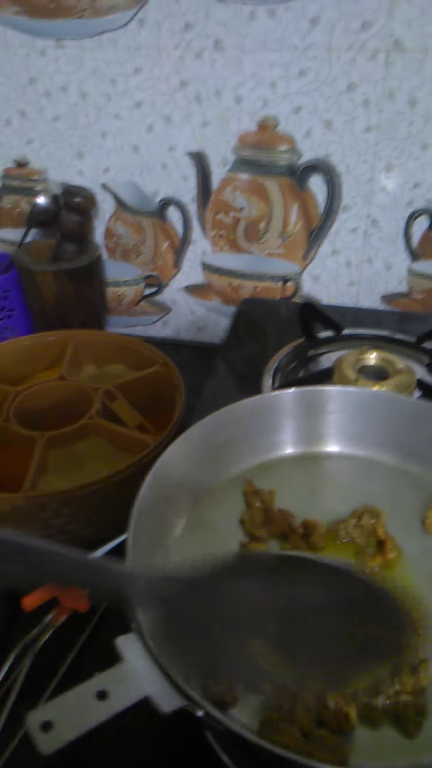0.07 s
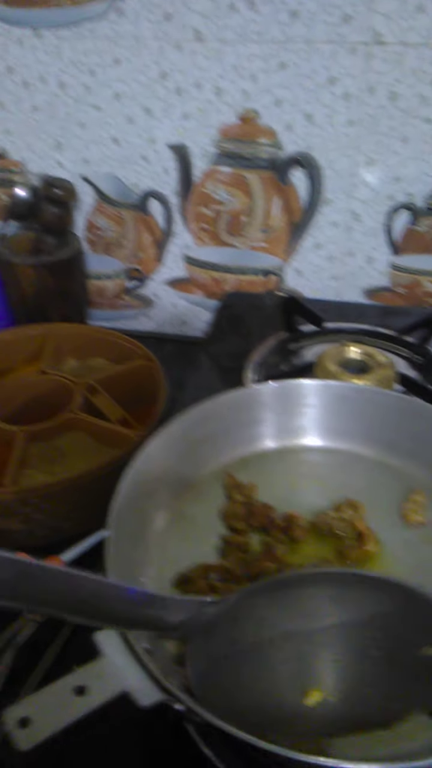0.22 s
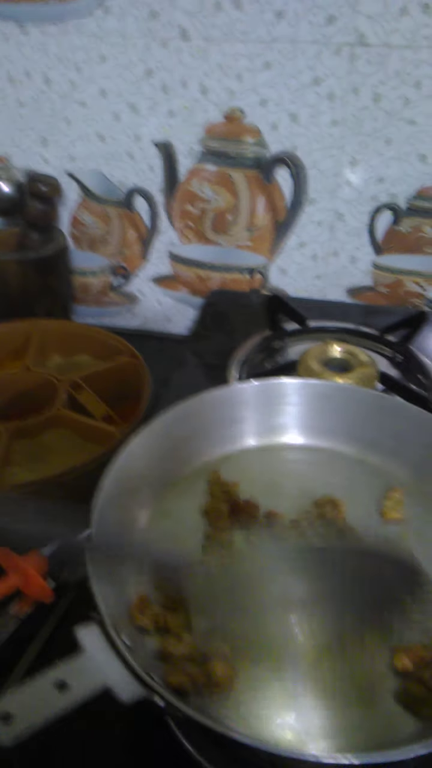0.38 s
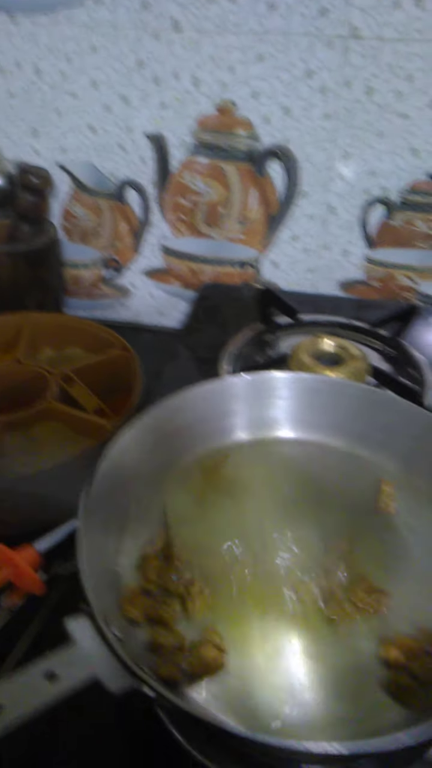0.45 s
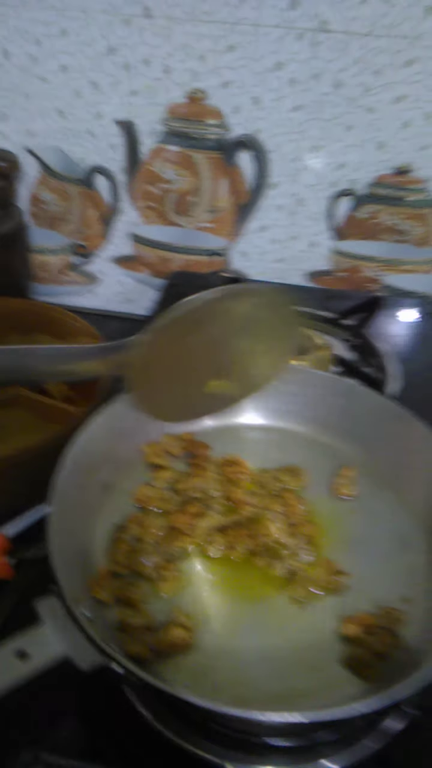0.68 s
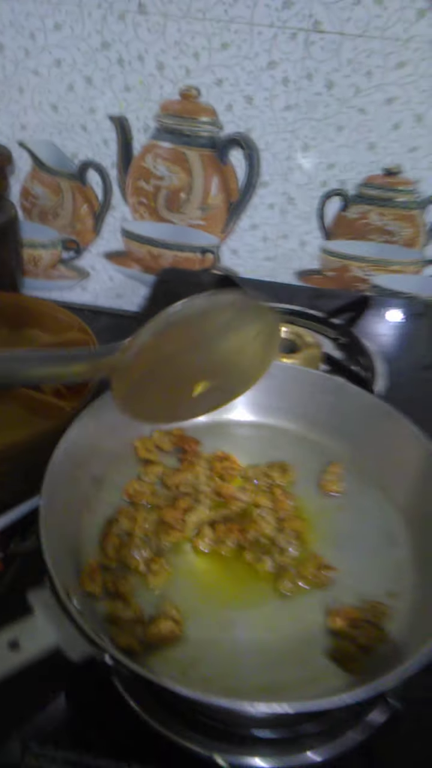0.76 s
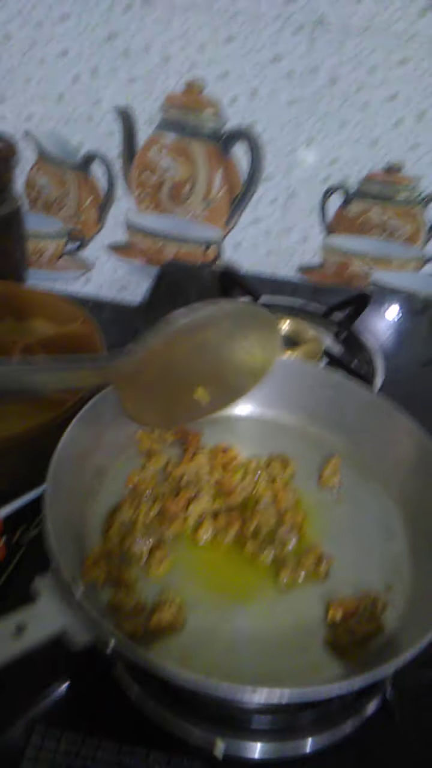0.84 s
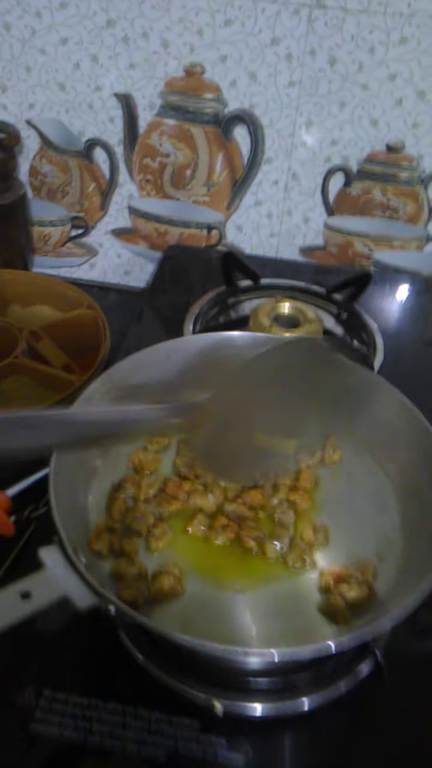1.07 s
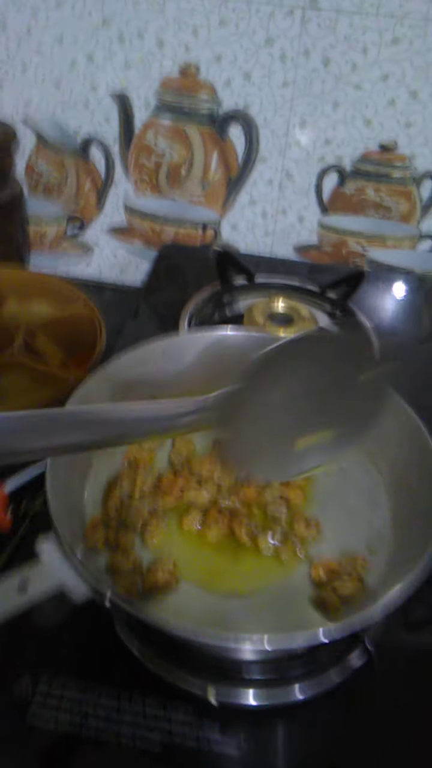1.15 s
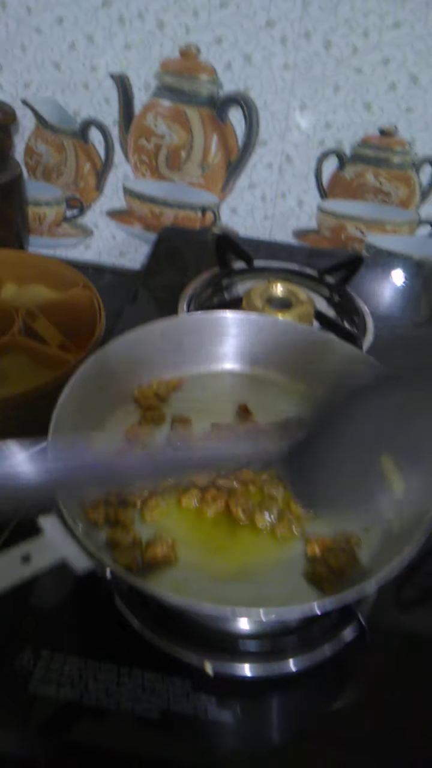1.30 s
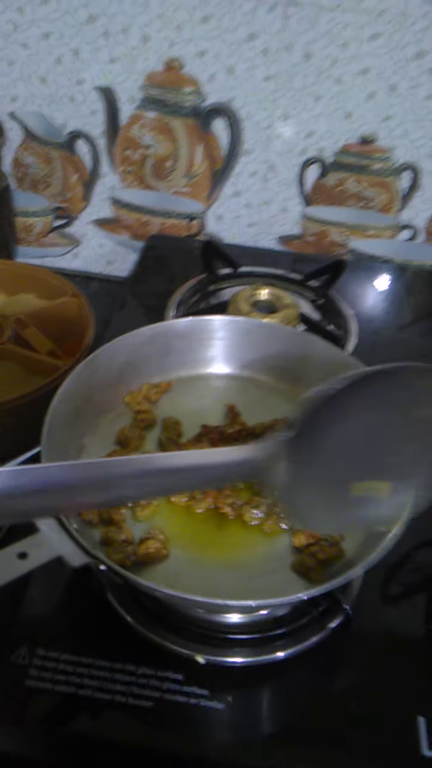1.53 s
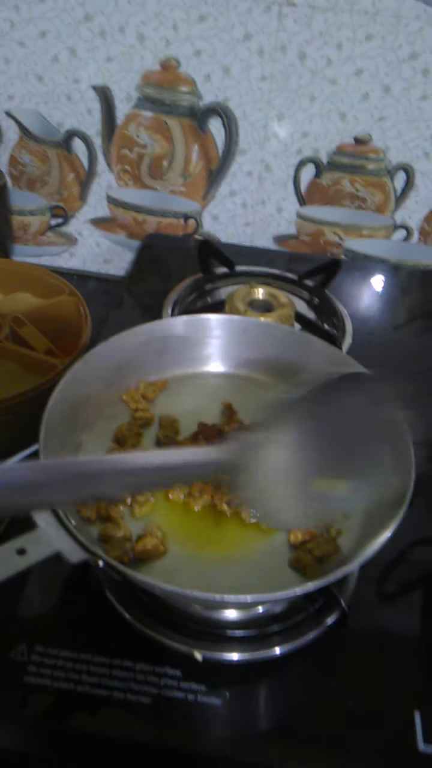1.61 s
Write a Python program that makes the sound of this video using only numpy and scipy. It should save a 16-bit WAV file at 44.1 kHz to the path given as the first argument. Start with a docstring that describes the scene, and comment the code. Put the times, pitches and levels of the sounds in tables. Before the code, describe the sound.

A steel ladle scrapes, knocks and grinds in a steel pan, then strikes its rim

```python
"""Ladle in a steel pan

A steel ladle stirs food in a steel pan on a stove, in a small tiled kitchen.
It scrapes, knocks and grinds the metal, slides in oil, pushes through food, strikes the rim and drags on.
Strokes are coloured random slips; knocks are noise clashes plus decaying partials and a dense wash.
Oil sizzles faintly (coloured noise and pops) over a low hum (a wavering sine)."""
import sys
import numpy as np
from scipy import signal
from scipy.fft import rfft, irfft
from scipy.io import wavfile

SR = 44100
rng = np.random.default_rng(int(sys.argv[2]) if len(sys.argv) > 2 else 0)


def file_out(sig):
    """Save sig as 16-bit WAV at sys.argv[1]."""
    # one column per channel
    cols = np.atleast_2d(sig).T
    # limit, then scale
    lim = np.clip(cols, -1, 1)
    pcm = np.round(lim * 32767).astype(np.int16)
    wavfile.write(sys.argv[1], SR, pcm)


N = 72765
T = np.arange(N) / SR  # [s]
HUM_HZ, BAND_EDGE_HZ = 70, 14450
CEILING = .74  # of full scale

# Colours: (frequency [Hz], relative density [dB per Hz]); each is scaled to energy 1.
# Sizzle and room air: level (time [s], level [dB]), then colour
SIZZLE_LEVEL = [(0, -61), (.65, -61.5), (1.1, -60.5), (1.65, -61.5)]
AIR_COLOUR = [(20, 5.5), (45, -29), (70, 7.5), (100, 1), (200, -4.5), (500, -14.5), (1500, -11.5),
              (3000, -16), (4600, -12.5), (6000, -5.5), (6900, -3), (8300, -15), (11000, -21.5),
              (14000, -28)]
# Hum: (time [s], level [dB])
HUM_LEVEL = [(0, -59.5), (.42, -69.5), (.525, -55.5), (.59, -66), (1.03, -68.5), (1.13, -57.5), (1.25, -72),
             (1.65, -68)]
# Room decay: (frequency [Hz], t60 [s])
ROOM_T60 = [(100, 0.29), (400, 0.29), (1100, 0.37), (3000, 0.29), (6500, 0.24), (13000, 0.26)]
# Side signal: (frequency [Hz], gain [dB])
SIDE_GAIN = [(3200, -69.5), (4800, -42), (6500, -19.5), (8000, -8), (14000, -8.5)]
# Light rubs of the ladle:
# (start [s], length [s], level [dB], first frequency [Hz], last frequency [Hz], width [Hz])
RUBS = [(0.511, 0.023, -55, 464, 468, 110), (0.582, 0.026, -56, 1138, 1208, 332),
        (.705, .1, -61.5, 290, 510, 220), (0.792, 0.1, -58.5, 585, 748, 302),
        (0.834, 0.048, -55.5, 1850, 2000, 800), (1.111, 0.3, -64, 841, 1015, 722),
        (1.156, 0.35, -69, 2790, 2770, 1000), (1.504, 0.05, -45.5, 388.8, 344, 110),
        (1.524, 0.013, -51, 3700, 3680, 1200)]
# Light touches of the ladle: (time [s], level [dB]), then colour
TOUCHES = [(0.051, -43.5), (.176, -51.5), (0.591, -59.5), (0.838, -47.5), (0.927, -49.5), (1.474, -46),
           (1.527, -49)]
TOUCH_COLOUR = [(200, -28.5), (700, -1.5), (2000, 7), (2900, 0.5), (3800, 3), (6300, 0), (8500, -24.5),
                (14000, -36)]
# Squeals of the scraping edge: (peak time [s], frequency [Hz], level [dB], t60 [s])
SQUEALS = [(.005, 5771, -44.5, .15), (.06, 4370, -41, .14), (.062, 3138, -54, .14),
           (.062, 5900, -45.5, .28), (.062, 5310, -44.5, .38), (.06, 1120, -45.5, .55),
           (.072, 6550, -38, .12), (.185, 5920, -46, .2), (.195, 4576, -57, .3), (.262, 4576, -29, .08),
           (.3, 6185, -35, .12), (.318, 6810, -38, .09)]
# Strokes: friction (time [s], level before trim [dB]), then colour
# Ladle edge on the dry pan floor
SCRAPE_FRICTION = [(0, -36), (.04, -34.5), (.095, -39.5), (.125, -47.5), (.165, -52), (.18, -42), (.2, -48),
                   (.214, -43)]
SCRAPE_COLOUR = [(60, -19), (130, -8.5), (220, -18.5), (470, -6), (750, -6), (1100, -1), (1600, -9),
                 (3000, -18.5), (4900, -15), (5700, -1.5), (7000, -3.5), (8200, -6.5), (9500, -15.5),
                 (14000, -21.5)]
# Ladle edge grinding up the pan wall
GRIND_FRICTION = [(.245, -25.5), (.28, -29.5), (.297, -22), (.322, -25), (.337, -55), (.4, -79)]
GRIND_COLOUR = [(40, -37), (80, -25.5), (125, -4.5), (180, -14.5), (260, -8), (450, -9), (1100, -5),
                (2400, -11.5), (3500, -15), (4900, -17), (6000, -2), (6900, 1), (8200, -11.5),
                (9500, -20.5), (14000, -30)]
# Ladle sliding on the oiled pan floor
SLIDE_FRICTION = [(.33, -40), (.37, -34), (.42, -44), (.455, -43), (.505, -47.5), (.535, -75), (.56, -89.5)]
SLIDE_COLOUR = [(100, -41), (250, -14), (420, 2.5), (700, -12), (1080, 4), (1500, -5), (2600, -12),
                (4800, -21.5), (5800, -3.5), (7000, -48), (12000, -44)]
# Ladle pushing through the food
PUSH_FRICTION = [(.84, -66.5), (.872, -40), (.91, -40.5), (.948, -38.5), (.97, -52), (1.0, -54.5),
                 (1.02, -77.5)]
FOOD_COLOUR = [(60, -24), (130, -13.5), (330, 2.5), (550, 2.5), (950, -5.5), (1350, -2.5), (2100, -10.5),
               (2900, -19), (4000, -19.5), (6500, -35), (10000, -46)]
# Ladle dragging from the rim
DRAG_FRICTION = [(1.40, -41), (1.443, -35), (1.46, -58), (1.495, -49), (1.525, -43), (1.552, -48),
                 (1.57, -58.5), (1.65, -60.5)]
DRAG_COLOUR = [(60, -28), (130, -10), (230, -4.5), (370, 3), (520, -1), (800, 1.5), (1120, -10.5),
               (1500, -9.5), (2600, -29), (3700, -13.5), (6500, -33), (10000, -45)]
# Bounces of the ladle edge: (time [s], level [dB]), then colour
REBOUNDS = [(.2192, -14), (.2253, -18.5), (.2805, -27.5), (.2945, -26.5), (1.3242, -17.5), (1.3345, -17.5)]
REBOUND_COLOUR = [(200, -23.5), (1000, -5.5), (2300, -3), (4000, -6), (6600, 4), (12000, -20.5)]
# Steel modes: (frequency [Hz], relative level [dB])
PAN_MODES = [(345, -16), (473, -9), (672, -11), (815, -8), (872, -13), (971, 1), (1053, -6), (1138, -11),
             (1211, -7), (1497, -16), (1895, -15), (2406, -17), (4355, -13), (4574, -8), (5329, -8),
             (5950, -6), (6552, -5), (6920, -8), (7445, -13)]
LADLE_MODES = [(465, 1), (560, -7), (662, -2), (745, -6), (845, -3), (880, -1), (1082, -2), (1124, -5),
               (1190, -6), (1674, -1), (2202, -6), (2638, -5), (2735, -4), (3208, -1), (3840, 3),
               (4102, -5), (4463, -5), (4657, -4), (5033, -2), (6142, -2), (6433, -1), (6928, -1)]
# Colours of the quick clash and of the dense after-ring of each blow
WALL_CLASH = [(30, -34.5), (60, -27.5), (150, -26), (400, -17.5), (700, -11), (980, 1), (1400, -14),
              (2200, -9.5), (3400, -22), (4550, -17), (4950, -23), (5300, -15.5), (5600, -19.5),
              (6000, -6.5), (6350, -13), (7000, -7.5), (8600, -27.5), (14000, -35.5)]
WALL_RING = [(40, -27.5), (130, -13), (330, 0.5), (470, -2), (560, -9), (700, -4), (1080, 9.5), (1500, 5),
             (2300, -10), (5000, -9.5), (6100, -6.5), (7200, -13.5), (9000, -25.5), (14000, -33)]
RIM_CLASH = [(40, -59), (110, -25.5), (200, -12), (480, -9), (640, -10.5), (860, 1.5), (1700, -5),
             (2100, -11.5), (2800, 0), (3500, -4.5), (3880, 6.5), (4500, -1.5), (5500, -0.5), (6900, 1),
             (8500, -4), (10300, -6.5), (14000, -18.5)]
RIM_RING = [(40, -66), (90, -47), (150, -11.5), (400, -2), (900, 1), (1500, -4.5), (2200, -8), (3800, -6),
            (5400, -4.5), (6700, 2), (8500, -8.5), (11000, -18), (14000, -28)]


def amp(db):
    """Decibels to gain."""
    return 10 ** (np.asarray(db) / 20)


def unit(x):
    """Scales to rms 1."""
    return x / np.sqrt(np.mean(x ** 2) + 1e-20)


def read(points, hz):
    """Reads a table on a log-frequency axis."""
    f, value = np.transpose(points)
    return np.interp(np.log(hz + 1), np.log(f + 1), value)


def level(points):
    """Gain over time from (s, dB) points, silent beyond 30 ms outside them."""
    s, db = np.transpose(points)
    active = (T >= s[0] - .03) * (T <= s[-1] + .03)
    return amp(np.interp(T, s, db)) * active


def place(s, sound):
    """Delays a sound to its moment."""
    return np.concatenate([np.zeros(max(round(s * SR), 0)), sound])[:N]


def through(x, response):
    """Convolution cut to the scene length."""
    return signal.fftconvolve(x, response)[:N]


def colour(points, size=4096):
    """Causal minimum-phase impulse response with this spectrum and energy 1."""
    hz = abs(np.fft.fftfreq(size, 1 / SR))
    log_gain = np.log(amp(read(points, hz)))
    spectrum = np.exp(np.conj(signal.hilbert(log_gain)))
    h = np.fft.ifft(spectrum).real[:size // 2]
    return h / np.linalg.norm(h)


def fade(t60):
    """Decay by 60 dB in t60 seconds."""
    return np.exp(-np.log(1000) * T / t60)


def drift(per_s):
    """Slow random wander of rms 1."""
    f = np.fft.rfftfreq(N, 1 / SR)
    spectrum = rfft(rng.standard_normal(N)) * np.exp(-(f / per_s) ** 2)
    return unit(irfft(spectrum, N))


def taps(size=8):
    """Dense reflections of random sign and even strength, one per slot of size samples."""
    out, at = np.zeros(N), np.arange(0, N - size, size)
    out[at + rng.integers(0, size, len(at))] = rng.choice([-1, 1], len(at))
    return unit(out)


def tail(size=256):
    """Diffuse sound of the kitchen, each band dying at its own speed."""
    hz, t, z = signal.stft(taps(), SR, nperseg=size)
    decay = np.exp(-np.log(1000) * t / read(ROOM_T60, hz)[:, None])
    return signal.istft(z * decay, SR, nperseg=size)[1][:N]


def stove(pops_db=-9, pops_per_s=500, waver_rad=.4):
    """Faint frying with tiny pops, and a low hum of wavering phase."""
    pops = unit(rng.standard_normal(N) * (rng.random(N) < pops_per_s / SR))
    frying = unit(rng.standard_normal(N) + amp(pops_db) * pops)
    sizzle = through(frying, colour(AIR_COLOUR))
    hum = unit(np.sin(2 * np.pi * HUM_HZ * T + waver_rad * drift(6.5)))
    return level(SIZZLE_LEVEL) * sizzle + level(HUM_LEVEL) * hum


def soft_rubs():
    """Narrow noise bands that swell, glide and fade as the ladle moves."""
    out = np.zeros(N)
    for s, length_s, db, first_hz, last_hz, width_hz in RUBS:
        u = np.clip((T - s) / length_s, 0, 1)  # progress 0..1
        phase = 2 * np.pi * np.cumsum(first_hz + (last_hz - first_hz) * u) / SR
        band = drift(width_hz / 2) * np.cos(phase) + drift(width_hz / 2) * np.sin(phase)
        out += amp(db) * np.sqrt(4 * u * (1 - u)) * band
    return out


def ticks(events, spectrum, t60, room_db):
    """Coloured bursts of dense taps, each with a little room."""
    out = np.zeros(N)
    for s, db in events:
        burst = taps() * fade(t60) + amp(room_db) * tail()
        out += place(s, amp(db) * through(burst, colour(spectrum)))
    return out


def touches():
    """Light contacts of the ladle: short ticks."""
    return ticks(TOUCHES, TOUCH_COLOUR, t60=0.13, room_db=-11)


def squeals(rise_s=.014, waver_rad=0.86, waver_per_s=45, flutter_db=2):
    """Where the edge catches, one partial swells, wavers and rings out."""
    out = np.zeros(N)
    for s, hz, db, t60 in SQUEALS:
        before_s, after_s = np.minimum(T - s, 0), np.maximum(T - s, 0)
        swell = np.exp(-(before_s / rise_s) ** 2 - np.log(1000) * after_s / t60)
        gain = amp(db + flutter_db * drift(110)) * swell
        out += gain * unit(np.sin(2 * np.pi * hz * T + waver_rad * drift(waver_per_s)))
    return out


def rub(curve, spectrum, slips_per_s, uneven_db, room_db):
    """Tiny slips of uneven size under a stroke excite the pan and the room."""
    size = amp(uneven_db * np.minimum(rng.exponential(1, N), 3)) * rng.choice([-1, 1], N)
    slips = unit(size * (rng.random(N) < slips_per_s / SR)) * level(curve)
    dry, room = through(slips, colour(spectrum)), tail()
    return dry + amp(room_db) * through(dry, room / np.linalg.norm(room))


def strokes():
    """Bright scrape and grind on steel, smoother slide in oil, dull push through food, last drag."""
    scrape = rub(SCRAPE_FRICTION, SCRAPE_COLOUR, slips_per_s=5400, uneven_db=4, room_db=-5.5)
    grind = rub(GRIND_FRICTION, GRIND_COLOUR, slips_per_s=3300, uneven_db=4.0, room_db=-5.0)
    slide = rub(SLIDE_FRICTION, SLIDE_COLOUR, slips_per_s=2500, uneven_db=2, room_db=-6.0)
    food = rub(PUSH_FRICTION, FOOD_COLOUR, slips_per_s=2600, uneven_db=2.6, room_db=-6.5)
    drag = rub(DRAG_FRICTION, DRAG_COLOUR, slips_per_s=2000, uneven_db=4.0, room_db=-5)
    on_steel = amp(-2.0) * scrape + squeals() + amp(-3.0) * grind
    return on_steel + amp(-2.5) * slide + amp(-0.5) * food + amp(-2.5) * drag


def thud(s=.216, db=-37, hz=75, t60=.13):
    """The knock jolts the pan on its stand: a short low push."""
    return place(s, amp(db) * fade(t60) * np.sin(2 * np.pi * hz * T))


def rebounds():
    """The ladle edge bounces on the steel after each knock: short bright clacks."""
    return ticks(REBOUNDS, REBOUND_COLOUR, t60=0.025, room_db=-15)


def ring(modes, build_cycles, t60_at_1k=0.33, damping_slope=0.2, low_cut_hz=220):
    """Steel partials build up quickly, and the high ones die sooner; a gentle low cut keeps them free of bass."""
    partials = np.zeros(N)
    for hz, db in modes:
        build = 1 - np.exp(-T * hz / build_cycles)
        decay = fade(t60_at_1k * (1000 / hz) ** damping_slope)
        partials += amp(db) * build * decay * np.sin(2 * np.pi * (hz * T + rng.random()))
    return signal.sosfilt(signal.butter(2, low_cut_hz, "highpass", fs=SR, output="sos"), partials)


def blow(s, modes, modes_db, free_db, free_s, build_cycles, clash, clash_db, clash_t60,
         snap_db, after, after_db, rise_s, snap_t60=0.021, chatter_db=2):
    """Snap and chattering clash, partials louder until the ladle settles, and a dense after-ring."""
    contact = (fade(clash_t60) + amp(snap_db) * fade(snap_t60)) * amp(chatter_db * drift(130))
    crack = amp(clash_db) * through(taps() * contact, colour(clash))
    wash = amp(after_db) * through(tail() * (1 - np.exp(-T / rise_s)), colour(after))
    free = 1 / (1 + (T / free_s) ** 8)  # falls from 1 to 0 around free_s
    partials = amp(modes_db) * ring(modes, build_cycles) * (1 + amp(free_db) * free)
    return place(s, crack + wash + partials)


def knocks():
    """The ladle hits the pan wall, exciting pan modes, and later the rim, exciting ladle modes."""
    wall = blow(.2145, PAN_MODES, modes_db=-18.0, free_db=-4, free_s=0.035, build_cycles=.6,
                clash=WALL_CLASH, clash_db=-13.5, clash_t60=0.21, snap_db=-3.0,
                after=WALL_RING, after_db=-20.0, rise_s=0.0061)
    rim = blow(1.321, LADLE_MODES, modes_db=-31, free_db=-2.5, free_s=0.023, build_cycles=2.6,
               clash=RIM_CLASH, clash_db=-18, clash_t60=0.15, snap_db=-22,
               after=RIM_RING, after_db=-15.0, rise_s=0.029)
    return wall + rim


def scene():
    """All is central; only the treble flickers between left and right."""
    mid = stove() + soft_rubs() + touches() + strokes() + thud() + rebounds() + knocks()
    flicker = signal.hilbert(mid).imag * drift(71)
    side_gain = amp(read(SIDE_GAIN, np.fft.rfftfreq(2 * N, 1 / SR)))
    side = irfft(rfft(flicker, 2 * N) * side_gain)[:N]
    return np.array([mid + side, mid - side])


def record(dry):
    """Soft limiting of the peaks, then the band limit."""
    held = dry / (1 + (dry / CEILING) ** 6) ** (1 / 6)
    low_pass = signal.firwin(401, BAND_EDGE_HZ, window=("kaiser", 8), fs=SR)
    return signal.oaconvolve(held, low_pass[None], "same")


dry = scene()
out = record(dry)
file_out(out)
```